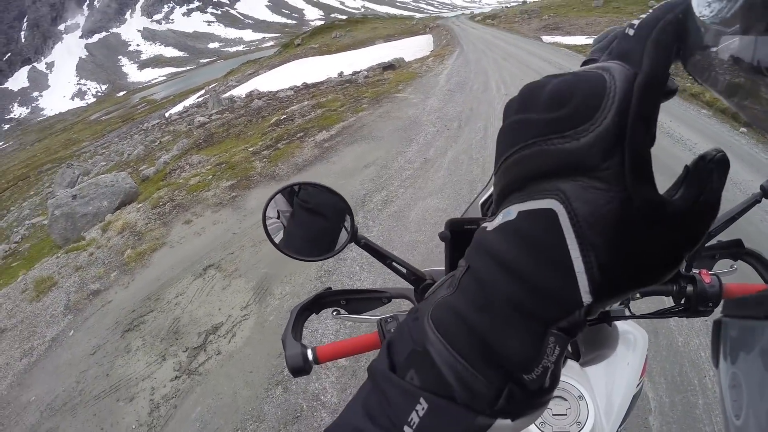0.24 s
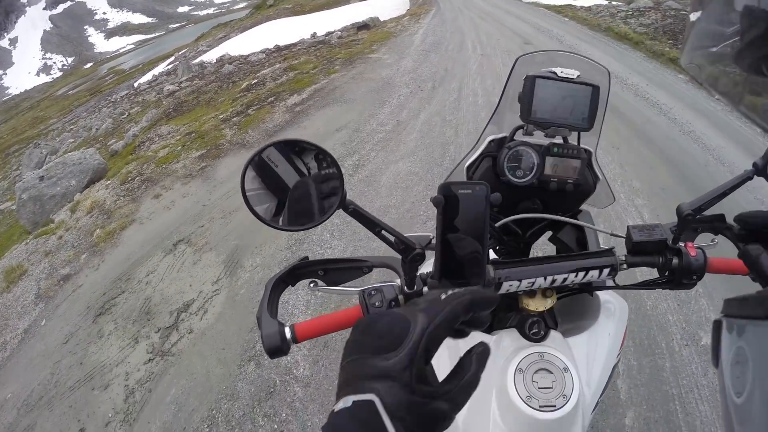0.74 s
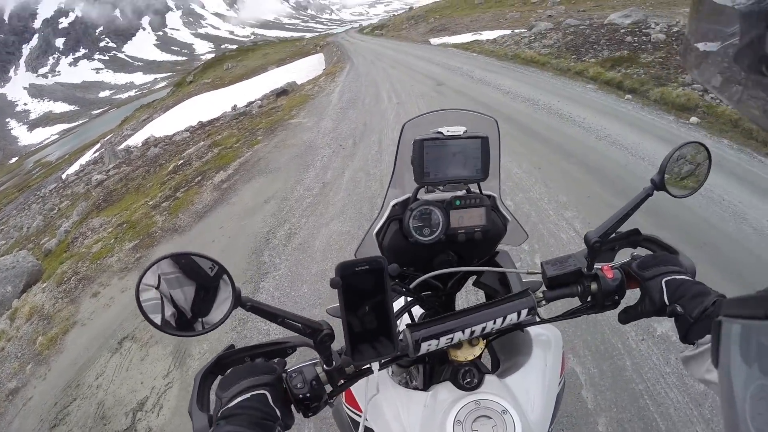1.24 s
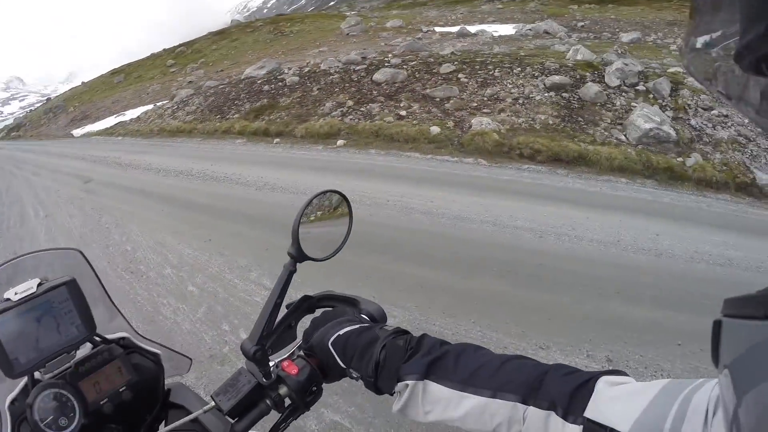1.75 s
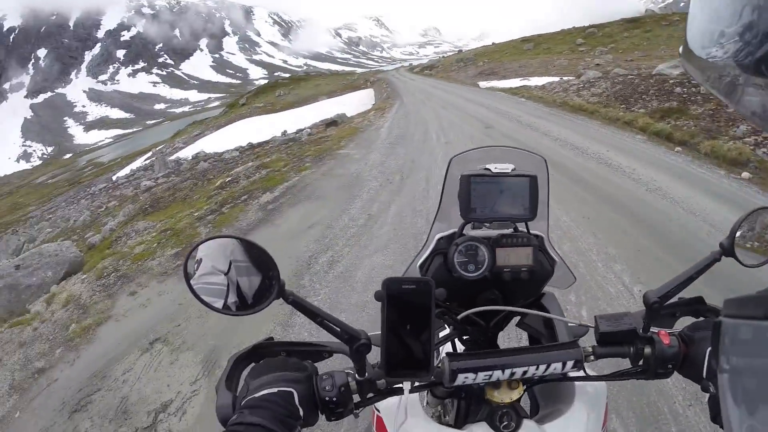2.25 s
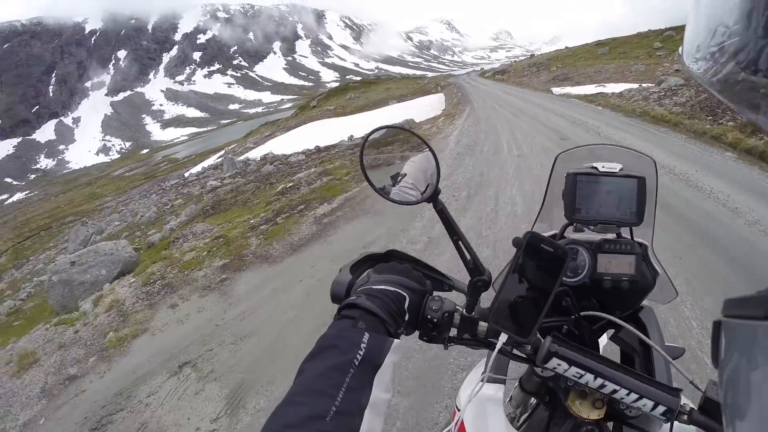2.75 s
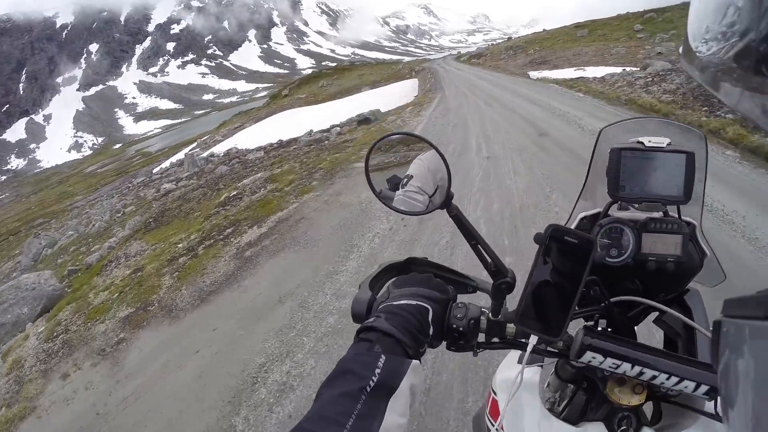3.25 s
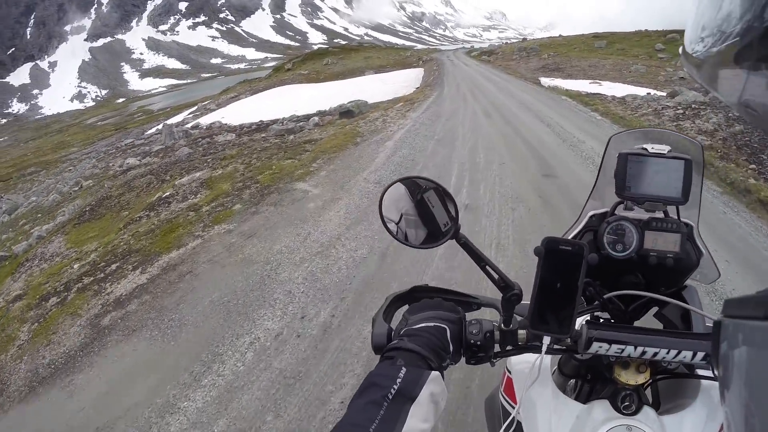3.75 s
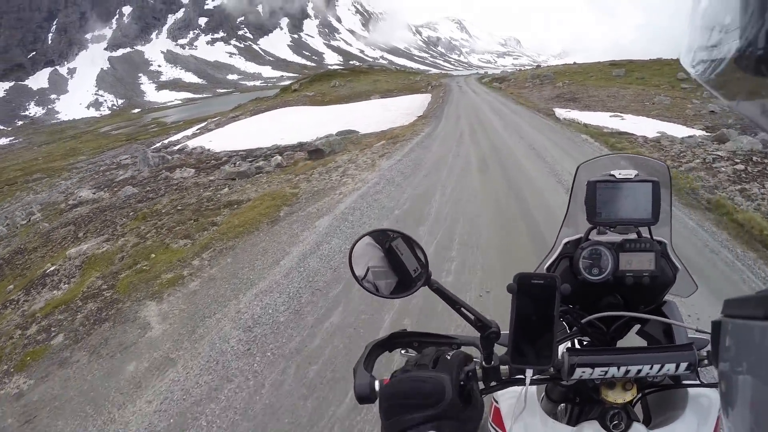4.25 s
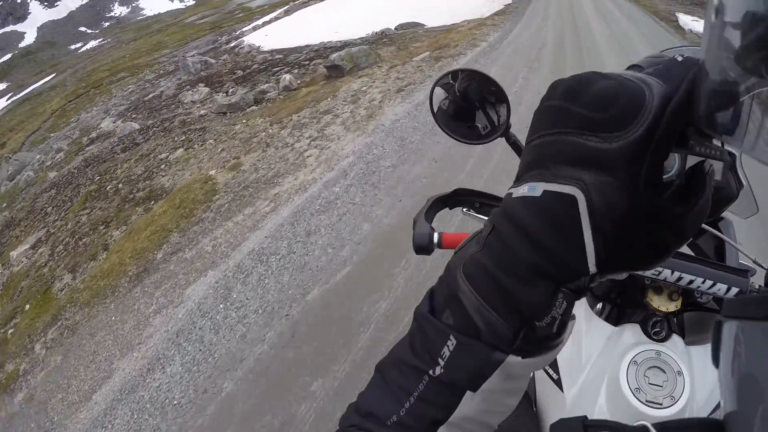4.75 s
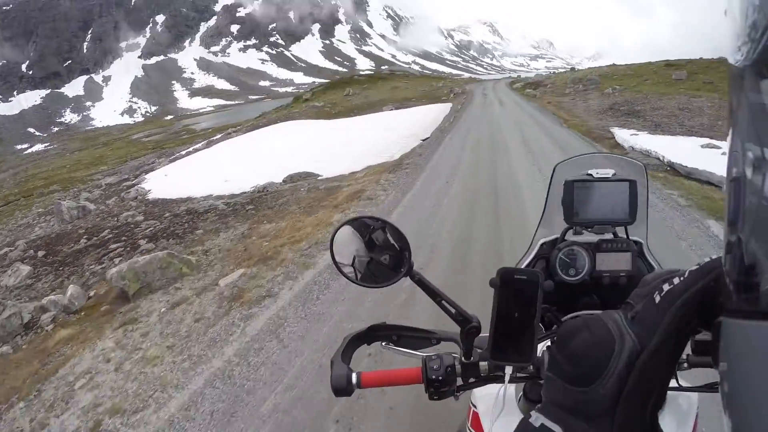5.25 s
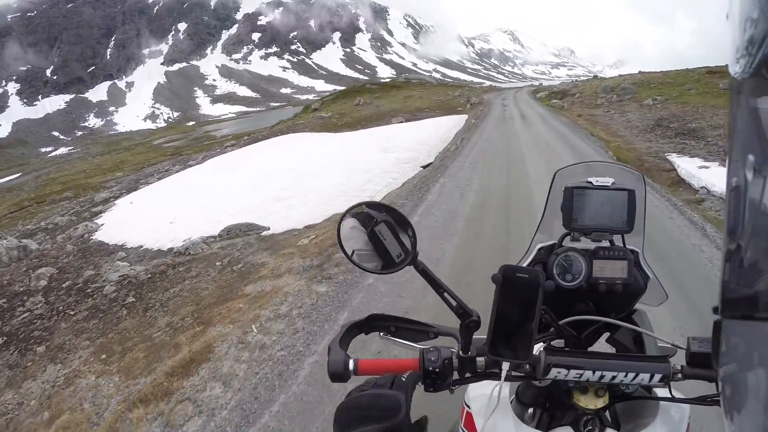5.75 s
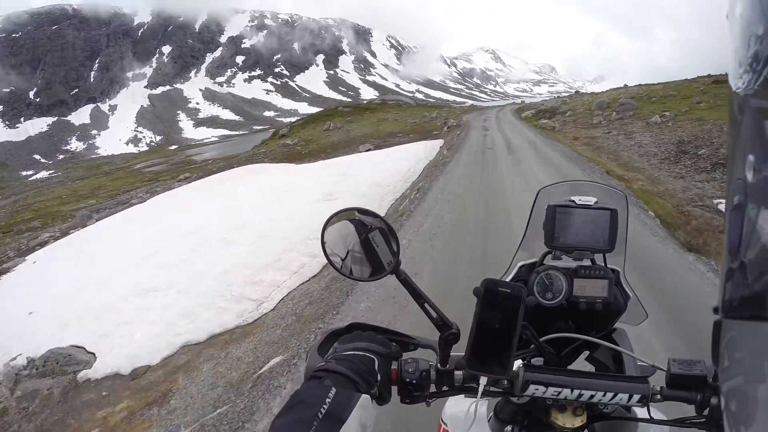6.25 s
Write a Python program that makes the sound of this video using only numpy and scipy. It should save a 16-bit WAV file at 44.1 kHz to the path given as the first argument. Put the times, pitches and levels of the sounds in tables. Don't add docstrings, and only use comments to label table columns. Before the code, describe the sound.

A single-cylinder motorcycle idles with ticking valves, pulls away and climbs in pitch on gravel, while wind thumps and a helmet visor snaps shut.

```python
import sys
import numpy as np
from scipy import signal
from scipy.fft import rfft, irfft, next_fast_len
from scipy.io import wavfile
from scipy.ndimage import uniform_filter1d

SR = 44100
rng = np.random.default_rng(int(sys.argv[2]) if len(sys.argv) > 2 else 0)


def convert_level_to_amplitude(level_db):
    exponent = np.asarray(level_db, float) / 20
    return 10 ** exponent


def generate_wav(sig):
    pcm = np.round(np.clip(np.atleast_2d(sig).T, -1, 1) * 32767).astype(np.int16)
    wavfile.write(sys.argv[1], SR, pcm)


N = 286071

# frequency in Hz, level in dB per Hz.
WIND_SPECTRUM = [(12, 2.5), (30, 3.5), (60, -1), (120, -12), (250, -16), (500, -18), (1200, -72)]
# frequency in Hz, level in dB.
WIND_SIDE = [(30, -8.5), (120, -3.5), (400, -17)]
# time in seconds, wind level in dB.
WIND_LEVEL = [(0, -22), (.4, -25.5), (.95, -26.5), (1.2, -19), (1.45, -22.5), (1.8, -30), (2.1, -26),
              (2.5, -22), (2.9, -20), (3.4, -18.5), (3.84, -17), (4.0, -15), (4.32, -11.5), (4.45, -13.5),
              (4.95, -18.5), (5.25, -19.5), (5.8, -29), (6.49, -28)]
# frequency in Hz, level in dB per Hz.
ROAD_SPECTRUM = [(20, -45), (60, 1), (110, -0.5), (230, -7), (400, -12), (650, -28), (2000, -69)]
# time in seconds, level in dB.
ROAD_LEVEL = [
    (5.3, -1),
    (5.95, -0.5),
]
# middle in seconds, length in seconds, clatter lift in dB,
# hiss lift in dB.
RUB_EVENTS = [(0.058, 0.44, 0, 2.5), (0.23, 0.18, 2.5, 2), (0.38, 0.1, -2.5, 7.5), (0.57, 0.21, 1.5, 5),
              (0.85, 0.23, 3, 3), (1.57, 0.13, -5, 11), (1.61, 0.044, 0.5, -0.5), (1.723, 0.16, 2, 6),
              (2.017, 0.21, 2, 2), (2.484, 0.1, 4, 1.5), (4.792, 0.39, 7.5, 6.5), (5.01, 0.14, -1, 2),
              (5.53, 0.17, -6.5, 1.5)]
# frequency in Hz, level in dB per Hz.
RUSTLE_SPECTRUM = [(900, 7.5), (1500, -5.5), (2500, -9), (3900, -13.5), (4700, -15.5), (6000, -18.5),
                   (9500, -23), (12000, -26.5), (14000, -35), (16000, -68)]
# time in seconds, peak in dB, polarity, width in ms, gain drop in dB.
THUMP_EVENTS = [(0.26, -5, 1, 9.3, 1.5), (3.554, 5, 1, 4.3, 3.5), (3.679, 1, 1, 11, 1),
                (3.853, -17, 1, 7.4, 5.5), (4.014, -25, 1, 4.4, 5.5), (4.156, -11, 1, 4.4, 4.5),
                (4.335, -11, 1, 4.4, 3), (4.397, 6, 1, 13, 0), (4.412, 4, -1, 8.8, 7),
                (4.495, 0.5, -1, 11, 3.5), (4.592, -17, 1, 4.3, 4), (4.793, -25, 1, 2.5, 5.5),
                (5.1291, 5, 1, 2.3, 20.5), (5.4606, 13, -1, 2, 0), (5.75, -5, -1, 7.8, 2.5),
                (5.9, -1.5, 1, 6, 0.5), (6.418, -1, 1, 4.2, 6.5), (5.4643, -10, 1, 2.2, 15)]
# time in seconds, peak in dB, brightness in dB,
# left minus right in dB, crack pitch in Hz.
SNAP_EVENTS = [(0.2622, -22, -22, -11.5, 1750), (0.685, -39, -6, -3, 1820), (1.435, -36, -19, -4, 1560),
               (1.553, -31.5, -14, -10, 1750), (1.718, -37, 11, 13, 1450), (1.728, -23.5, 1, 4, 700),
               (2.096, -32, -30, -9, 1830), (4.635, -37, -1, 13, 1930), (4.7323, -35, -23.5, -4.5, 1400),
               (4.7885, -17.5, -9, 14, 1540), (4.7917, -25.5, -11, 6, 2420), (4.9573, -28, -6, 5, 1640),
               (4.963, -33.5, -10, 4, 2400), (4.973, -34, 2, 8, 1540), (5.045, -30, 2, 8, 1300),
               (5.058, -17, -8, 0, 1270), (5.0603, -26, -8, -17, 1960), (5.066, -36, 5, 7, 2500),
               (5.086, -37, -12, 13, 2030), (5.0988, -23, -15, -4, 1530), (5.103, -34, 5, 11, 2490),
               (5.118, -39, 0, 1.5, 1990), (5.1278, -36.5, -7, -16, 1380), (5.3762, -45.5, 5, -8, 1610),
               (5.4196, -40, -17, -14, 1860), (5.438, -52, 16, 11, 1990), (5.4603, -26, -18, -12, 1470),
               (5.562, -41.5, -14, -13, 1760), (5.578, -39, -3, -2, 1400), (6.4176, -38, -4, -11, 1440),
               (0.244, -40, -20, -2, 3400), (1.568, -42, -25, -4, 2600), (5.4255, -47, -15, -6, 2200),
               (5.581, -44, 0, 0, 1400), (1.628, -37, -25, -4, 2600), (5.4437, -45, 0, 2, 2600),
               (5.4515, -43, 6, 6, 2800), (5.033, -43, -5, 3, 2600), (5.14, -56, -10, 3.5, 2000),
               (5.151, -53, -9, 4, 2600), (0.865, -50, -23, -3, 1200), (2.01, -35, -18, -7, 1190),
               (4.451, -44, -16, 0, 990), (6.072, -57, -33, 0, 1200)]
# frequency in Hz, level in dB.
SHELL_MODES = [(600, 14), (880, 8), (1200, 15), (1600, 11), (2050, -1), (2650, -11.5), (3440, -27),
               (4920, -12)]
# frequency in Hz, gain in dB.
SHUT_VISOR_COLOUR = [(400, 1), (750, -6.5), (1100, 5.5), (2500, 3), (5000, 0.5), (10000, -5.5)]
# frequency in Hz, left minus right in dB.
PORT_TILT_DB = [(60, 0.5), (200, 0), (500, 0), (1100, -5.5), (2380, 1), (4400, 1.5), (8120, 5), (15000, 0)]
# frequency in Hz, level in dB.
PORT_SPREAD_DB = [(200, -30), (600, -43), (1400, -3.5), (2500, -3), (4000, 0.5), (7000, 2.5), (15000, 8)]
# frequency in Hz, width in Hz, level in dB.
HEAD_MODES = [(2650, 1800, 3.5), (4500, 220, 4.5), (5850, 760, 2.5), (6940, 650, -6), (8730, 1600, -1),
              (10740, 1100, -6)]
# frequency in Hz, width in Hz, level in dB.
CASE_MODES = [(354, 90, -3), (524, 95, 2.5), (589.5, 79, -5.5), (683, 71, -9), (753, 295, -7),
              (1079, 107, -5.5), (1262, 96, -7), (1696, 370, -14), (2324, 640, -17)]
# time in seconds, part of the cycle at which it ticks.
TICK_PHASE = [(0, .45), (2.1, .445), (2.35, .355), (2.9, .33), (3.6, .365), (3.95, .385), (4.4, .375),
              (5.0, .37), (5.7, .3), (6.49, .24)]
# engine order, middle in seconds, half length in seconds,
# level in dB.
SINGING_ORDERS = [(22, 4.15, 0.18, -14), (23, 4.43, 0.24, -10.5), (24, 4.66, 0.18, -15),
                  (14, 5.1, 0.44, -17.5), (12, 5.7, 0.65, -24), (7, 6.15, 0.51, -11.5), (8, 5.49, 0.59, -8),
                  (21, 3.9, .2, -20), (18, 4.2, 0.29, -24), (9, 5.4, 0.56, -21), (10, 5, 0.38, -14)]
# time in seconds, firings per second.
ENGINE_SPEED = [(0.0, 13.78), (0.24, 12.67), (0.75, 13.63), (1.03, 13.47), (1.2, 12.54), (1.45, 13.21),
                (1.79, 12.72), (2.09, 13.46), (2.37, 19.23), (2.61, 19.33), (3.05, 20.33), (3.41, 18.2),
                (3.62, 15.89), (4.32, 22.7), (4.71, 25.65), (5.2, 28.95), (5.9, 33.3), (6.36, 35.5)]
# time in seconds, exhaust level in dB.
ENGINE_EFFORT = [(0, -19), (.36, -19), (1.1, -20), (1.7, -21.5), (2.05, -20), (2.5, -18.5), (2.9, -18),
                 (3.3, -20), (3.6, -20), (3.84, -17), (4.03, -20.5), (4.33, -15), (4.46, -21.5), (4.7, -16),
                 (5.3, -19), (5.6, -16), (5.85, -17.5), (6.49, -14)]
# time in seconds, stage (0 idling, 1 pulling, 2 driving, 3 cruising).
RIDING_STAGE = [
    (2.12, 0),
    (2.24, 1),
    (3.92, 1),
    (4.12, 2),
    (4.45, 2),
    (5.1, 3),
]
# stage, clatter in dB, hiss in dB, tick in dB.
STAGE_TREBLE = [
    (0, -13, -24.5, -33),
    (1, -14.5, -26, -39),
    (2, -13.5, -23.5, -43),
    (3, -16.5, -26, -51),
]
# frequency in Hz, swell in ms, arrival in ms from the loudest moment,
# level in dB, polarity.
IDLE_PATHS = [(45, 15.0, -0.2, -25.8, 1), (67, 7.0, -12.7, -10.2, 1), (90, 10.0, -17.5, -25.2, -1),
              (151, 7.0, -3.9, -23.7, -1), (180, 3.0, -8.8, -9.1, -1), (240, 10.0, -5.0, -17.5, 1),
              (269, 2.0, -12.9, -17.8, -1)]
# frequency in Hz, swell in ms, arrival in ms, level in dB, polarity.
PULL_PATHS = [(101.6, 4.5, -14.5, -23, -1), (99, 6.8, 1.5, -15.5, 1), (102, 0.88, -30, -20.5, 1),
              (162, 4, -7.5, -9, -1), (227.3, 3.9, -12, -12, -1), (218.6, 2.7, -2.5, -4, -1),
              (322.4, 11.6, -5.5, -32.5, 1), (397, 4.9, -3, -22.5, 1), (450, 2.8, 1.5, -24.5, 1),
              (534, 6, -20.5, -22, -1)]
# frequency in Hz, swell in ms, arrival in ms, level in dB, polarity.
DRIVE_PATHS = [(49.5, 9.2, -18.5, -15.5, -1), (62, 5.7, -29.5, -15, -1), (67, 3.2, -4, -10, 1),
               (156, 6.9, -14, -13.5, -1), (225, 8.1, -12, -12, -1), (243, 8.6, -5, -21.5, 1),
               (497, 4.6, -11.5, -21, 1)]
# frequency in Hz, swell in ms, arrival in ms,
# level in dB, polarity.
CLIMB_PATHS = [(255.5, 16, -6.5, -25.5, 1), (181, 19.5, -10, -24, -1), (377, 6, -14, -26.5, 1),
               (444, 3.8, -7.5, -19, 1)]
# frequency in Hz, swell in ms, arrival in ms, level in dB, polarity.
CRUISE_PATHS = [(43.7, 5.7, -18, -21.5, -1), (75.4, 12.7, -20, -21.5, -1), (112, 7.1, 1, -39, 1),
                (142, 9.6, -6, -26, -1), (241, 5.3, -8, -15.5, 1), (265, 5, -4, -61, -1),
                (408.4, 6.6, -7.5, -31.5, 1)]

VISOR_SHUT_S = 5.132
INLET_LEAD_CYCLES = 0.215


def curve(t, table):
    return np.interp(t, *np.transpose(table))


def unit(x):
    return x / np.sqrt(np.mean(x ** 2))


def colour(x, points, share=1):
    hz, db = np.transpose(points)
    size = next_fast_len(N)
    log_hz = np.log(np.arange(size // 2 + 1) * SR / size + 1)
    gain = convert_level_to_amplitude(share * np.interp(log_hz, np.log(hz), db))
    return irfft(rfft(x, size) * gain, size)[:N]


def ring(x, hz, width_hz):
    b, a = signal.iirpeak(hz, hz / width_hz, SR)
    return signal.lfilter(b, a, signal.lfilter(b, a, x))


def walk(rate_hz):
    hold = int(SR / rate_hz)
    held = np.repeat(rng.standard_normal(N // hold + 1), hold)
    return 1.65 * uniform_filter1d(uniform_filter1d(held, hold), hold)[:N]


def grains(rate_hz, spread_db):
    when, size, sign = rng.random((3, N))
    return (when < rate_hz / SR) * convert_level_to_amplitude(-spread_db * np.log(size + 0.03)) * np.sign(sign - 0.5)


def wind():
    gust = convert_level_to_amplitude(0.87 * walk(17))
    mid = unit(colour(gust * grains(400, 1.95), WIND_SPECTRUM))
    side = unit(colour(gust * grains(400, 1.95), WIND_SPECTRUM))
    return mid + colour(side, WIND_SIDE) * np.array([[1], [-1]])


def road():
    return unit(colour(grains(130, 9.6) + 1.97 * grains(900, 4.3), ROAD_SPECTRUM))


def rubs(t):
    lift_db = np.zeros((3, N))
    for middle_s, length_s, clatter_db, hiss_db in RUB_EVENTS:
        swell = np.cos(np.pi * np.clip((t - middle_s) / (2 * length_s), -0.5, 0.5)) ** 2
        lift_db += np.array([[clatter_db], [hiss_db], [0]]) * swell
    return lift_db


def rustle(ticks):
    hiss = rng.standard_normal(N) * convert_level_to_amplitude(1.7 * walk(30))
    return unit(colour(hiss * (1 + convert_level_to_amplitude(6) * ticks), RUSTLE_SPECTRUM))


def thumps(t):
    lumps, drop_db = np.zeros(N), np.zeros(N)
    for s, peak_db, polarity, width_ms, duck_db in THUMP_EVENTS:
        shape = np.exp(-np.abs((t - s) * 4300 / width_ms) ** 1.53)
        lumps += np.sign(polarity) * convert_level_to_amplitude(min(peak_db - 1.5, -1)) * shape
        age_s = np.maximum(t - s - 0.002, 0)
        drop_db += duck_db * (1 - np.exp(-age_s / 0.003)) * np.exp(-age_s / 0.14)
    return lumps - uniform_filter1d(lumps, size=1500), drop_db


def snaps():
    out, t = np.zeros((2, N)), np.arange(SR // 20) / SR
    rise = np.minimum(t / 0.0003, 1)
    edge_fade = rise * convert_level_to_amplitude(-60 * t / 0.011)
    for s, peak_db, bright_db, pan_db, crack_hz in SNAP_EVENTS:
        t60_s = max(0.011 - 0.0002 * peak_db, 0.003)
        blow = rng.standard_normal(len(t)) * rise * convert_level_to_amplitude(-60 * t / t60_s)
        modes = np.zeros(len(t))
        for hz, mode_db in [*SHELL_MODES, (crack_hz, 17)]:
            b, a = signal.iirpeak(hz, hz / (110 + hz / 12), SR)
            level_db = mode_db + 1.5 * rng.standard_normal() - 4 * abs(np.log2(hz / crack_hz))
            modes += convert_level_to_amplitude(level_db) * unit(signal.lfilter(b, a, blow))
        edge = edge_fade * unit(ring(rng.standard_normal((2, len(t))), 7600, 9000))
        burst = 3.6 * modes / np.abs(modes).max() + convert_level_to_amplitude(bright_db - 3) * edge
        side_db = np.array([[pan_db / 2], [-pan_db / 2]])
        i = int(s * SR)
        out[:, i:i + len(t)] += (burst * convert_level_to_amplitude(peak_db + side_db))[:, :N - i]
    return out


def tappets(ticks):
    blows = ticks * rng.standard_normal(N)
    return unit(sum(convert_level_to_amplitude(db) * unit(ring(blows, hz, width_hz)) for hz, width_hz, db in HEAD_MODES))


def clatter(turns, valve, rate, load):
    def fade(part, decay_s):
        return np.exp(-(part % 1) / rate / decay_s)

    puffs = fade(valve - INLET_LEAD_CYCLES, 0.007) + 0.6 * fade(turns - 0.02, 0.006)
    puffs = uniform_filter1d(puffs, size=30)
    sway_db = 2.2 * np.cos(2 * np.pi * (turns - 0.85)) + walk(40)
    gate = (1 + (1.9 + 1.2 * load) * puffs) * convert_level_to_amplitude(sway_db)
    repeat = 0.7
    noise = rng.standard_normal(N)
    noise = np.sqrt(1 - repeat ** 2) * noise + repeat * noise[(valve / rate * SR).astype(int)]
    drive = gate * (noise + 0.59 * unit(grains(600, 2.5)))
    body = np.zeros(N)
    for hz, width_hz, db in CASE_MODES:
        load_db = -7.7 * load * (hz < 560) + 2 * load * (hz > 700)
        body += convert_level_to_amplitude(db + load_db) * unit(ring(drive, hz, width_hz * (1 + 0.5 * load.mean())))
    ticks = fade(valve, 0.0043)
    ticks = ticks + 0.45 * load * fade(valve - 0.27, 0.004)
    ticks = ticks + 0.5 * fade(valve - 0.5 - 0.07 * load, 0.004)
    return body, uniform_filter1d(ticks, size=160) * convert_level_to_amplitude(0.54 * walk(14))


def singing(t, turns):
    out = np.zeros(N)
    for order, middle_s, half_s, db in SINGING_ORDERS:
        span = np.abs(t - middle_s) < half_s
        swell = np.cos(np.pi * (t[span] - middle_s) / (2 * half_s))
        out[span] += convert_level_to_amplitude(db) * swell * np.sin(2 * np.pi * np.round(order) * turns[span])
    return out * convert_level_to_amplitude(1.3 * walk(13))


def gulp(t):
    start_s, length_s = 2.16, 0.07
    part = np.clip((t - start_s) / length_s, 0, 1)
    cycles = length_s * (1330 * part - 120 * part ** 2)
    return convert_level_to_amplitude(-34 + 6.5 * walk(300)) * np.sin(np.pi * part ** 0.41) * np.sin(2 * np.pi * cycles)


def intake(valve, rate):
    open_cycles = 0.42
    part = np.clip((valve - INLET_LEAD_CYCLES + 0.02) / open_cycles, 0, 1)
    speed_pitch = (rate / 20) ** 0.46
    cycles = (430 * part + 150 * part ** 2 / 2) * open_cycles / rate * speed_pitch
    swell = 1.6 * np.sqrt(np.sin(np.pi * part ** 0.85) + 1e-9) * np.exp(-1.2 * part)
    return swell * np.sin(2 * np.pi * cycles) * convert_level_to_amplitude(0.98 * walk(24.1))


def exhaust(firings, paths, share, scatter_db, jitter_ms, late_ms=0):
    out, t = np.zeros(N), np.arange(SR // 8) / SR
    for hz, swell_ms, arrival_ms, db, polarity in paths:
        time_luck, level_luck = rng.standard_normal((2, len(firings)))
        delay_ms = arrival_ms + late_ms + jitter_ms * time_luck
        at = firings + (delay_ms * SR / 1e3).astype(int)
        level = share[firings] * convert_level_to_amplitude(db + scatter_db * level_luck)
        inside = (at >= 0) & (at < N)
        pulses = np.zeros(N)
        pulses[at[inside]] = level[inside]
        age = t * 1e3 / swell_ms
        response = np.sin(2 * np.pi * hz * t) * age * np.exp(1 - age)
        out += np.sign(polarity) * signal.oaconvolve(pulses, response)[:N]
    return out


def ports(near, twins):
    far = np.roll(near, 5)
    left = near + colour(twins[0], PORT_SPREAD_DB)
    right = far + colour(twins[1], PORT_SPREAD_DB)
    return np.array([colour(left, PORT_TILT_DB, share=0.5), colour(right, PORT_TILT_DB, share=-0.5)])


def scene():
    t = np.arange(N) / SR
    rate = curve(t, ENGINE_SPEED)
    turns = np.cumsum(rate) / SR + 0.222
    firings = np.flatnonzero(np.diff(np.floor(turns)))
    valve = (turns - curve(t, TICK_PHASE)) % 1
    late = (0.0006 * SR * rng.standard_normal(len(firings))).astype(int)
    uneven = np.clip(firings + late, 0, N - 1)
    pipe, gust = convert_level_to_amplitude(curve(t, ENGINE_EFFORT)), convert_level_to_amplitude(curve(t, WIND_LEVEL))
    stage = curve(t, RIDING_STAGE)
    idle, pull, drive, cruise = (np.maximum(1 - np.abs(stage - k), 0) for k in range(4))

    steps, *columns = np.transpose(STAGE_TREBLE)
    stage_db = np.array([np.interp(stage, steps, column) for column in columns])
    shut_db = np.array([[-13], [-5], [-10]]) * np.clip((t - VISOR_SHUT_S) / 0.025, 0, 1)
    gear, cloth, head = pipe * convert_level_to_amplitude(stage_db + shut_db + rubs(t))

    note = exhaust(uneven, IDLE_PATHS, convert_level_to_amplitude(20.6) * pipe * idle, 0.6, 0.15)
    note += exhaust(firings, PULL_PATHS, convert_level_to_amplitude(17.6) * pipe * pull, 1.0, 0.04)
    note += exhaust(firings, DRIVE_PATHS, convert_level_to_amplitude(18) * pipe * drive, 0.8, 0.04, late_ms=4.5)
    note += exhaust(firings, CRUISE_PATHS, convert_level_to_amplitude(19.5) * pipe * cruise, 0.8, 0.04, late_ms=2.5)
    note += exhaust(firings, CLIMB_PATHS, convert_level_to_amplitude(19.5) * pipe * 4 * drive * cruise, 1.2, 0.06)
    honk_share = pull + 0.8 * drive + 0.45 * cruise * (t < VISOR_SHUT_S) + 0.12 * cruise
    note += convert_level_to_amplitude(-3.5) * pipe * honk_share * intake(valve, rate)
    road_share = convert_level_to_amplitude(-16) * drive + convert_level_to_amplitude(-3 + curve(t, ROAD_LEVEL)) * cruise
    rolling = pipe * road_share * road() + pipe * singing(t, turns)

    layers = []
    for _ in range(3):
        body, ticks = clatter(turns, valve, rate, pull + drive + 0.27 * cruise)
        treble = convert_level_to_amplitude(-0.5) * gear * body
        treble += convert_level_to_amplitude(10.5) * cloth * rustle(ticks)
        treble += convert_level_to_amplitude(1) * head * tappets(ticks)
        layers.append(np.where(t < VISOR_SHUT_S, treble, colour(treble, SHUT_VISOR_COLOUR)))
    lumps, drop_db = thumps(t)
    steady = ports(note + rolling + gulp(t) + layers[0], layers[1:]) + convert_level_to_amplitude(0.8) * gust * wind()
    return steady * convert_level_to_amplitude(-drop_db) + lumps + snaps()


def roll_off(x):
    return signal.sosfilt(signal.butter(12, 15630, fs=SR, output="sos"), x)


def record(dry):
    rounded = dry / (1 + dry ** 4) ** 0.25
    low_pass = signal.cheby2(8, 50, 16100, fs=SR, output="sos")
    finished = signal.sosfilt(low_pass, rounded)
    return roll_off(finished)


dry = scene()
out = record(dry)
generate_wav(out)
```